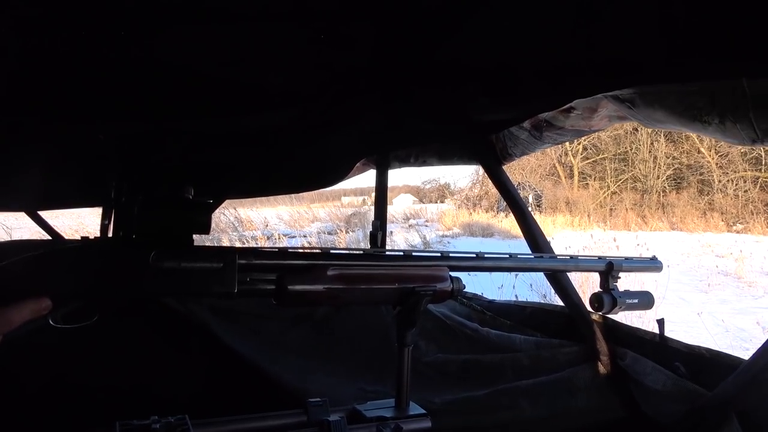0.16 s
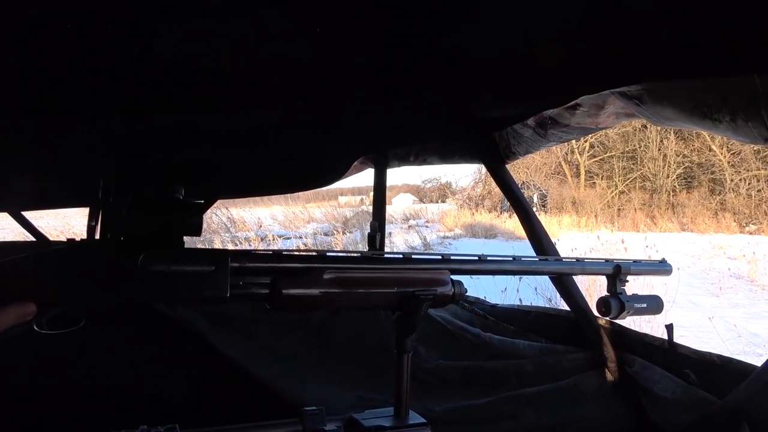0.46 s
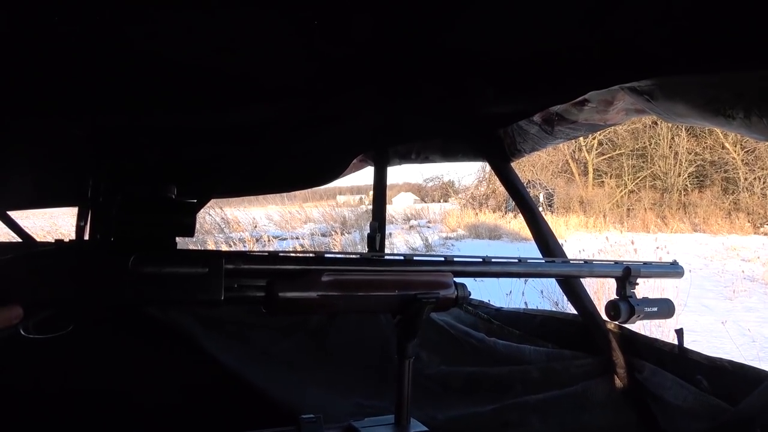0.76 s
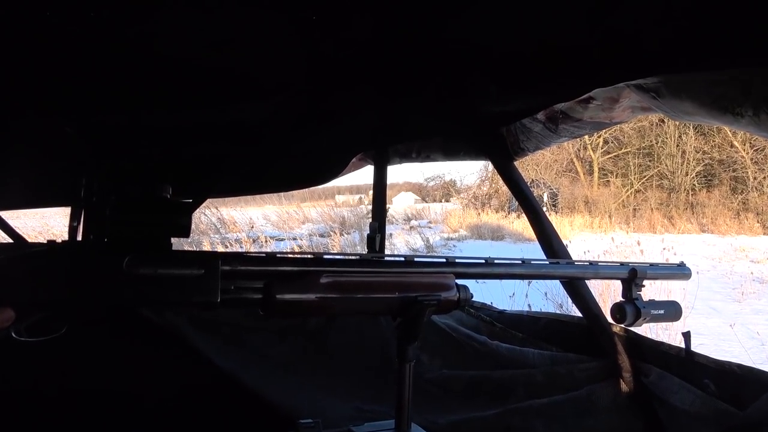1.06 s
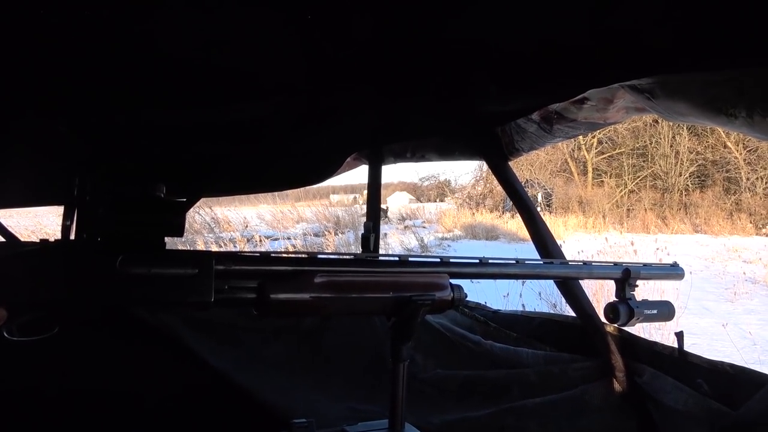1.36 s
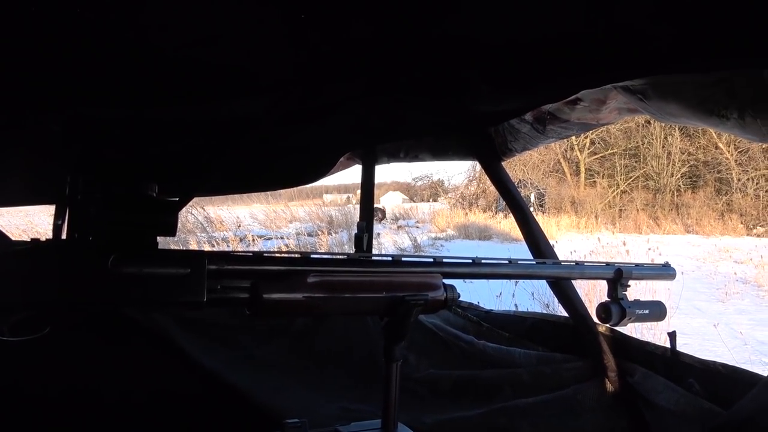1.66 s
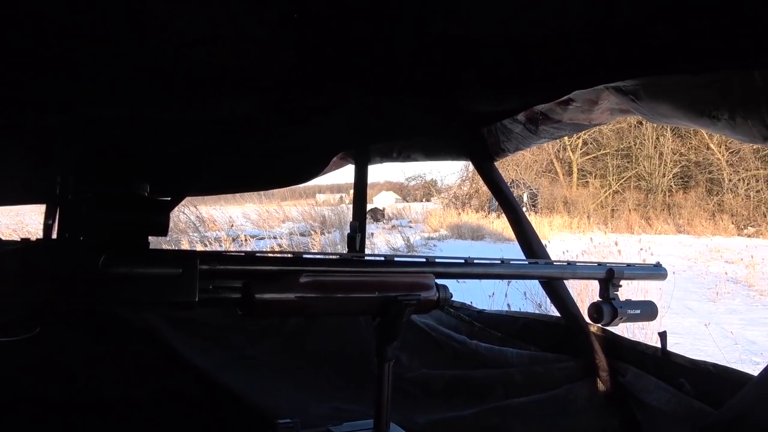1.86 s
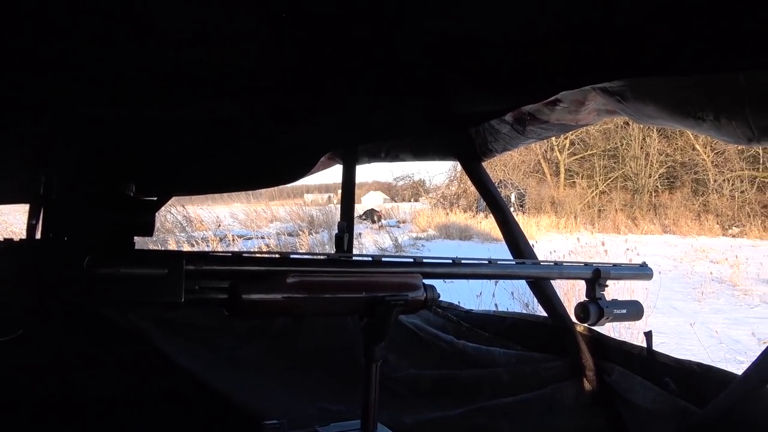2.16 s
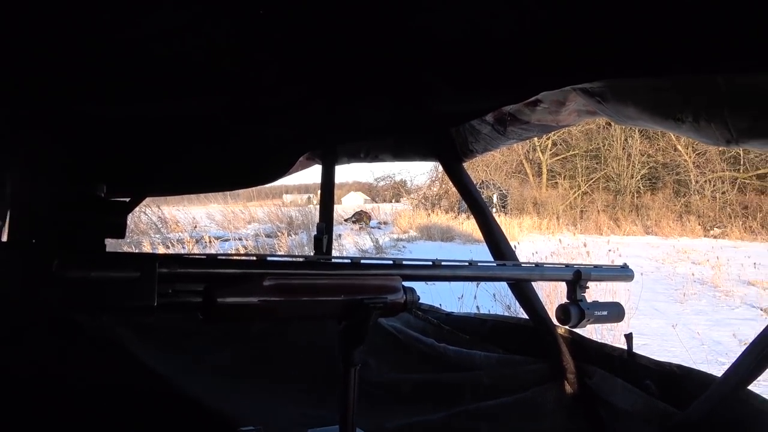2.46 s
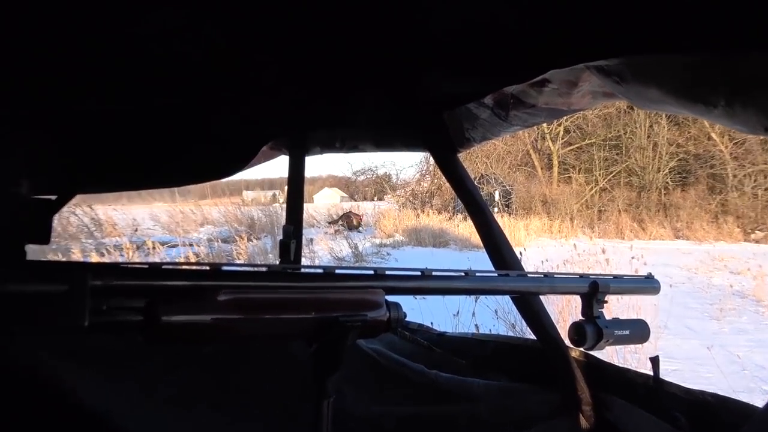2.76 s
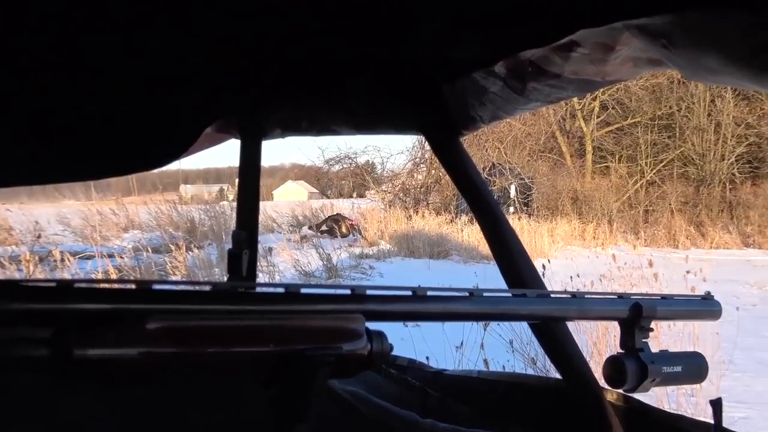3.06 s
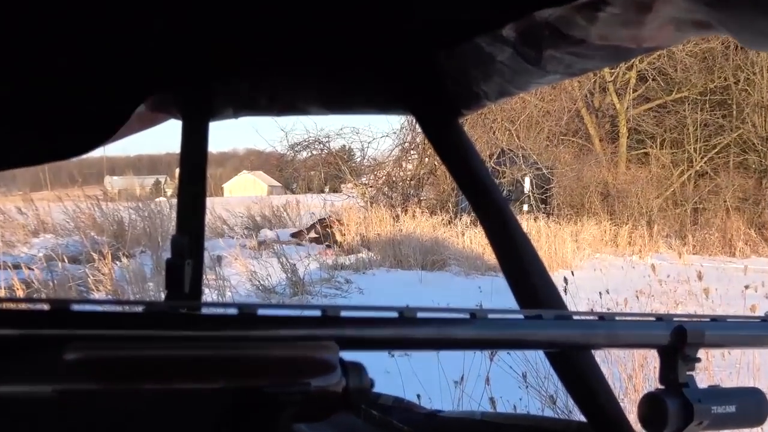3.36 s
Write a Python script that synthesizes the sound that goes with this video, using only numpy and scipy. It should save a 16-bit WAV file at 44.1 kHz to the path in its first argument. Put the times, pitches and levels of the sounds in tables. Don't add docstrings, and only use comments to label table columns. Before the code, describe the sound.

Turkey yelping in a snowy open field, heard from inside a fabric hide: low wind throbs first, a weak drawn-out call follows, then regular hoarse yelps, with faint bird whistles and small cloth rustles.

```python
import sys
import numpy as np
from scipy import signal
from scipy.fft import rfft, irfft, next_fast_len
from scipy.io import wavfile
from scipy.ndimage import uniform_filter1d, map_coordinates

SR = 44100
rng = np.random.default_rng(int(sys.argv[2]) if len(sys.argv) > 2 else 0)


def volts_from_decibels(level):
    exponent = np.asarray(level, float) / 20
    return 10 ** exponent


def waveform_to_disk(signal):
    frames = np.transpose(np.atleast_2d(signal))
    scaled = np.clip(frames, -1, 1) * 32767
    samples = np.round(scaled).astype(np.int16)
    wavfile.write(sys.argv[1], SR, samples)


N = 154350
T = np.arange(N) / SR


def unit(x):
    return x / np.sqrt(np.mean(x ** 2) + 1e-20)


def along(points, hz):
    f, v = np.transpose(points)
    return np.interp(np.log(np.abs(hz) + 0.092), np.log(f + 0.23), v)


def curves(rows):
    s, *cols = np.transpose(rows)
    return [np.interp(T, s, c) for c in cols]


def wobble(rate_hz):
    return map_coordinates(rng.standard_normal(N // 16), [T * rate_hz], mode="wrap")


def sine(hz):
    return np.sin(2 * np.pi * np.cumsum(hz) / SR)


def rush(spectrum, patchy_db):
    z = signal.stft(rng.standard_normal(N + 1024), nperseg=512)[2]
    field = uniform_filter1d(rng.standard_normal(z.shape), 6, 0)
    field = uniform_filter1d(field, 10, 1)
    x = signal.istft(z * volts_from_decibels(patchy_db * unit(field)), nperseg=512)[1][:N]
    m = next_fast_len(N + 8192)
    colour = volts_from_decibels(along(spectrum, np.fft.rfftfreq(m, 1 / SR)))
    return unit(irfft(rfft(x, m) * colour, m)[:N])


def gate(start_s, length_s, attack_s, release_s):
    edge = np.minimum((T - start_s) / attack_s, (start_s + length_s - T) / release_s)
    return np.sin(np.pi / 2 * np.clip(edge, 0, 1)) ** 2


# time_s, level_db
GUSTS = [(0.0, -46.5), (0.3, -33.5), (0.9, -37.5), (0.98, -45), (1.13, -32), (1.26, -51), (1.32, -35.5),
         (1.39, -49), (1.47, -31.5), (1.74, -39), (1.89, -30.5), (2.27, -33.5), (2.32, -48), (2.35, -34),
         (3.39, -27.5), (3.48, -27)]
# frequency_hz, density_db
RUMBLE_SPECTRUM = [(1, -37.5), (6, -10.5), (20, 4), (30, -4), (38, -5), (48, -12.5), (70, -35), (120, -60),
                   (200, -120)]
# frequency_hz, density_db
AIR_SPECTRUM = [(80, -40), (130, -11.5), (170, -1), (430, -4.5), (580, -6), (1040, -12), (1290, -10.5),
                (1500, -26), (2600, -45)]
# frequency_hz, density_db
DRONE_SPECTRUM = [(35, -28), (55, -0.5), (66, -8), (78, 3), (98, -14), (116, -8), (150, -18.5), (200, -71),
                  (300, -120)]
# time_s, level_db
DRONE_LEVEL = [(0, -59), (.35, -63), (.65, -64), (.9, -57), (1.2, -62), (1.5, -63), (1.75, -57.5),
               (2.1, -59), (2.4, -51.5), (2.7, -58), (3.0, -55), (3.5, -53)]


def wind():
    throb = np.sqrt(2) * sine(14 + 1.8 * wobble(11.0))
    buffet = throb + volts_from_decibels(-9.5) * rush(RUMBLE_SPECTRUM, patchy_db=-3.5)
    air_db = -62 + 1.5 + 1.7 * wobble(4.66)
    air = volts_from_decibels(air_db) * rush(AIR_SPECTRUM, patchy_db=1.5)
    drone_db = curves(DRONE_LEVEL)[0] + 0.96 * wobble(5.9)
    drone = volts_from_decibels(drone_db) * rush(DRONE_SPECTRUM, patchy_db=0)
    return volts_from_decibels(curves(GUSTS)[0]) * buffet + air + drone


# frequency_hz, density_db
HISS_SPECTRUM = [(1300, -12), (2100, -11), (3500, -10), (4200, -13.5), (5200, -10.5), (6300, -16.5),
                 (10000, -19), (13200, -18), (15600, -24)]
WHINE_PITCH = [13071, 13151, 12990, 13233, 12908, 13614, 13701, 8956, 11843]
# level_db (rms), unsteadiness_db
WHINE_LEVEL = [(-89, 1), (-89, 1), (-99, 2), (-99, 2), (-101, 2), (-95, 2), (-95, 2), (-100, 5), (-99, 5)]


def camera():
    out = volts_from_decibels(-69.5) * rush(HISS_SPECTRUM, patchy_db=0.83)
    for pitch_hz, (level_db, sway_db) in zip(WHINE_PITCH, WHINE_LEVEL):
        gain = volts_from_decibels(level_db + 3 + sway_db * wobble(5))
        out = out + gain * sine(pitch_hz + 3 * wobble(20))
    return out


# time_s, level_db
HUM_LEVEL = [
    (0, -60),
    (.2, -63),
    (.42, -67.5),
    (.56, -57.5),
    (.7, -54),
    (.82, -59),
    (.92, -67),
    (1.5, -67.5),
    (3.5, -67),
]


def hum():
    level_db = curves(HUM_LEVEL)[0] - 2.5 + 1.2 * wobble(13.0)
    return volts_from_decibels(level_db) * sine(430.3 + 1.9 * wobble(9.16))


# frequency_hz, decay_s (to -60 dB)
TREE_DECAY = [(500, .3), (1500, .7), (3500, .2), (5000, .15)]


def echoes(x, wet_db):
    delay_s = .008
    hz, t, z = signal.stft(rng.standard_normal(SR // 2), SR, nperseg=256)
    decay = volts_from_decibels(-60 * t / along(TREE_DECAY, hz)[:, None])
    tail = signal.istft(z * decay, SR, nperseg=256)[1]
    delayed = np.pad(x, (round(delay_s * SR), 0))
    return x + volts_from_decibels(wet_db) * signal.fftconvolve(delayed, tail / np.linalg.norm(tail))[:N]


# start_s, length_s, first_hz, last_hz
SONG_NOTES = [(1.63, .07, 3460, 3390), (1.71, .13, 3380, 3390), (1.785, .066, 3625, 3630),
              (1.852, .18, 3620, 3600), (2.122, .088, 5950, 4990), (2.192, .094, 4830, 4240),
              (2.302, .072, 4370, 4170), (2.416, .068, 5000, 4870), (2.472, .036, 4850, 4790),
              (2.494, .07, 3970, 3780), (2.552, .115, 3880, 3990), (0.0, .19, 2620, 2540),
              (.24, .12, 2360, 2340), (.08, .22, 3500, 3480), (.72, .07, 3500, 3490),
              (2.04, .03, 3630, 3600)]
SONG_LEVEL = [-71, -75.5, -70, -77.5, -74, -72, -62, -61.5, -69.5, -67, -72.5, -81, -82.5, -79, -82, -72]
SONG_FLUTTER = [0, .2, .05, .05, .2, .1, 0, 0, .1, 0, .3, .3, .3, .5, .3, .3]
SONG_SWELL = [-9, 4, 0.5, -4, 13, 11, 3, 9, -4, 4, -4, .1, -2, 7, .1, .1]


def songbird():
    edge_s, bow = .014, 1.45
    out, flutter = 0, wobble(300)
    for note, level_db, share, swell_db in zip(SONG_NOTES, SONG_LEVEL, SONG_FLUTTER, SONG_SWELL):
        start_s, length_s, first_hz, last_hz = note
        progress = np.clip((T - start_s) / length_s, 0, 1)
        pitch_hz = last_hz + (first_hz - last_hz) * (1 - progress) ** bow
        gain = volts_from_decibels(level_db + 3 + swell_db * (progress - .5)) * gate(start_s, length_s, edge_s, edge_s)
        out = out + gain * (np.sqrt(1 - share) + np.sqrt(share) * flutter) * sine(pitch_hz)
    return echoes(out * volts_from_decibels(1.2 * wobble(50)), wet_db=-17)


# start_s, peak_db, length_s, centre_hz, width_share (half width over centre)
CLOTH_RUSTLES = [(.205, -64, .04, 2600, .75), (.29, -75, .015, 5000, .5), (.9172, -59, .0022, 4000, .4),
                 (2.305, -72, .03, 2330, .1), (2.302, -69, .022, 3300, .45), (2.302, -70, .022, 12500, .35),
                 (2.382, -70, .028, 2330, .1), (2.378, -65, .03, 4000, .5), (2.383, -66, .016, 12500, .35),
                 (2.396, -73, .02, 12000, .3), (2.51, -76, .02, 2200, .3), (2.69, -75, .03, 2800, .4),
                 (2.844, -68, .015, 2800, .3), (3.38, -79, .03, 3500, .4)]


def cloth():
    out, t = np.zeros(N), np.arange(SR // 10) / SR
    for start_s, peak_db, length_s, hz, width in CLOTH_RUSTLES:
        grain_db = 5 * np.repeat(rng.standard_normal(len(t) // 30), repeats=30)
        grains = rng.standard_normal(len(t)) * volts_from_decibels(grain_db)
        edges_hz = np.clip([hz * (1 - width), hz * (1 + width)], 300, 19000)
        band = signal.butter(2, edges_hz, "bandpass", fs=SR)
        envelope = volts_from_decibels(peak_db - 9 * (t / length_s) ** 2) * np.minimum(t / (.1 * length_s), 1)
        out[round(start_s * SR):][:len(t)] += unit(signal.lfilter(*band, grains)) * envelope
    return out


# frequency_hz, gain_db
THROAT_RESONANCE = [(400, -24), (640, -7), (1000, -14), (1210, 0), (1400, -3), (1560, -5), (1740, -20),
                    (2100, -32)]


def voice(pitch_hz, rough, chest_db):
    jitter, rasp_hz = .008, 230
    phase = 2 * np.pi * np.cumsum(pitch_hz * (1 + jitter * wobble(70))) / SR
    out = 0
    for k in range(1, 4):
        share = np.clip(rough if k > 1 else rough / 8, 0, 1)
        rate_hz = rasp_hz * k / 2
        rasp = wobble(rate_hz) * np.sin(k * phase) + wobble(rate_hz) * np.cos(k * phase)
        gain = volts_from_decibels(along(THROAT_RESONANCE, k * pitch_hz) + chest_db * (k == 1))
        out = out + gain * (np.sqrt(2 - 2 * share) * np.sin(k * phase) + np.sqrt(share) * rasp)
    return out


# time_s, pitch_hz, level_db
OPENING_CALL = [
    (1.02, 460, -91),
    (1.05, 498, -69),
    (1.12, 542.4, -66),
    (1.2, 600, -62.5),
    (1.3, 623, -66.5),
    (1.42, 610.8, -68),
    (1.47, 568, -71),
    (1.5, 549, -72),
]
# start_s, length_s, top_hz, level_db
YELP_CALLS = [
    (1.67, 0.2, 679.6, -53),
    (2.015, 0.26, 707.5, -54),
    (2.44, 0.29, 713, -53.5),
    (2.897, 0.3, 690.5, -56),
    (3.383, 0.27, 684, -54.5),
]
YELP_RASP = [.55, .3, .25, .25, .25]
YELP_CHEST = [-4, .5, 1.5, 1, 0]
# frequency_hz, density_db
BREATH_SPECTRUM = [(700, -60), (1000, -12), (1250, 0), (1500, -5), (1850, -9), (2200, -30), (3000, -90)]


def turkey():
    start_share, rise_s, rest_hz, sag_share = .83, .054, 420, .42
    fade_db_per_s = 31
    breath = rush(BREATH_SPECTRUM, patchy_db=3.0)
    pitch_hz, level_db = curves(OPENING_CALL)
    sounding = level_db > level_db.min() + 6
    opening = voice(pitch_hz, rough=.55, chest_db=-3.5) + volts_from_decibels(-7) * breath
    out = volts_from_decibels(level_db) * sounding * opening
    for call, rough, chest_db in zip(YELP_CALLS, YELP_RASP, YELP_CHEST):
        start_s, length_s, top_hz, level_db = call
        t = np.maximum(T - start_s, 0)
        climb = 1 - (1 - start_share) * np.cos(np.pi / 2 * np.minimum(t / rise_s, 1)) ** 2
        late = np.maximum(t - rise_s, 0)
        sag = np.exp(-late ** 2 / (sag_share * length_s * (late + .022)))
        pitch_hz = climb * (rest_hz + (top_hz - rest_hz) * sag)
        gain = volts_from_decibels(level_db - fade_db_per_s * t) * gate(start_s, length_s, attack_s=.025, release_s=.05)
        out += gain * (voice(pitch_hz, rough, chest_db) + volts_from_decibels(-17) * breath)
    return echoes(out, wet_db=-8)


def scene():
    return (wind() + camera() + hum() + songbird() + cloth() + turkey())[None]


def low_pass(x):
    return signal.sosfilt(signal.butter(12, 15640, fs=SR, output="sos"), x)


def record(dry):
    return low_pass(dry)


dry = scene()
out = record(dry)
waveform_to_disk(out)
```